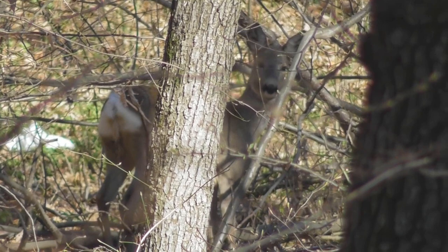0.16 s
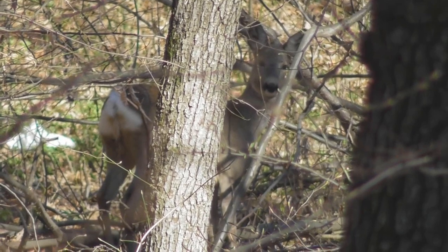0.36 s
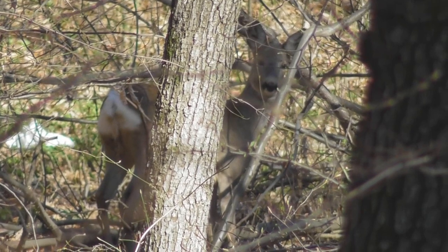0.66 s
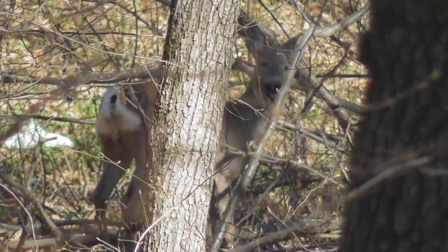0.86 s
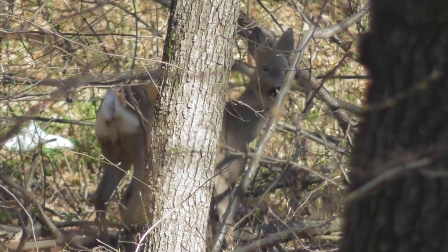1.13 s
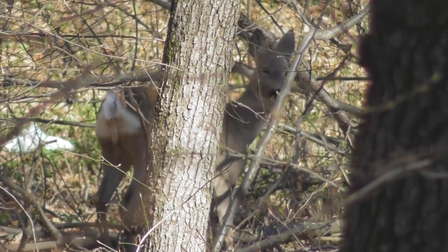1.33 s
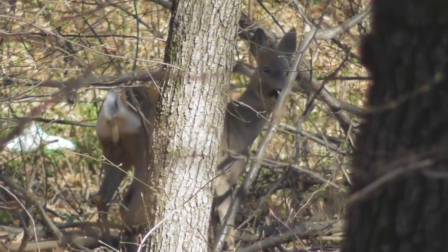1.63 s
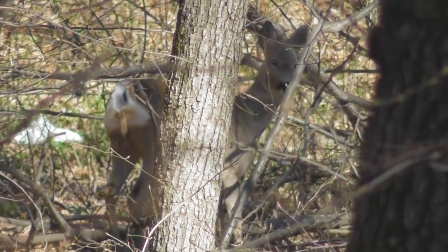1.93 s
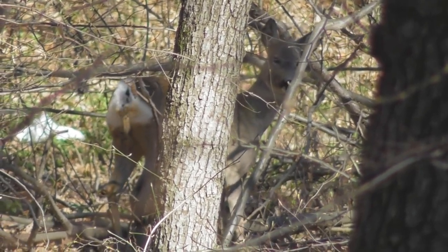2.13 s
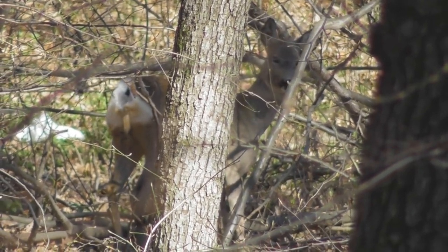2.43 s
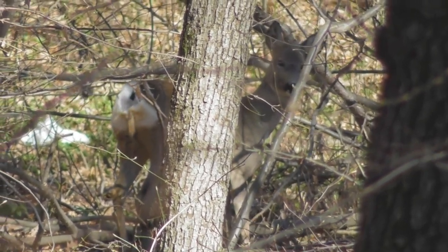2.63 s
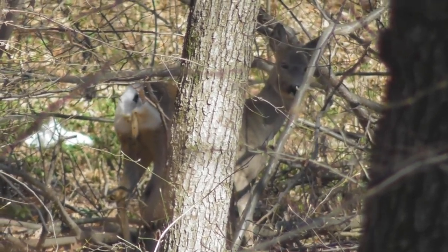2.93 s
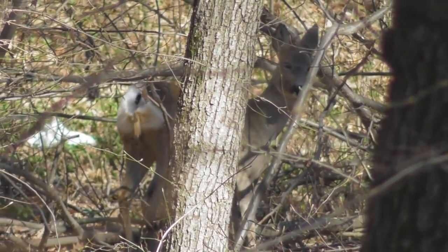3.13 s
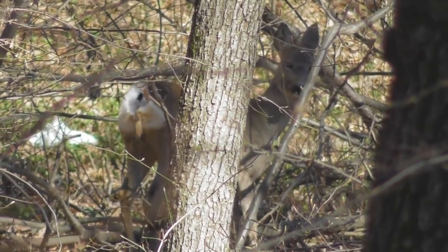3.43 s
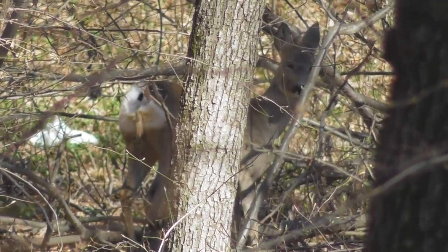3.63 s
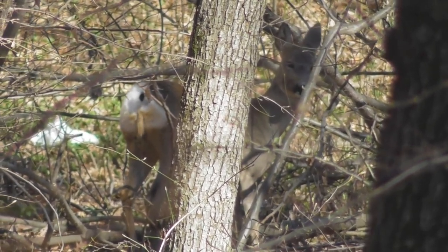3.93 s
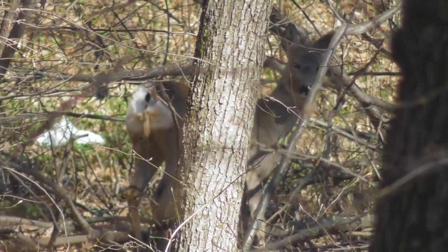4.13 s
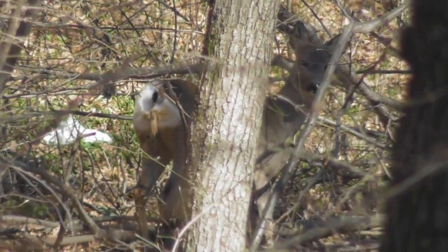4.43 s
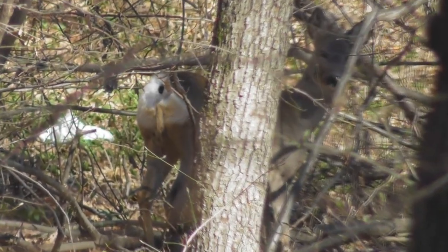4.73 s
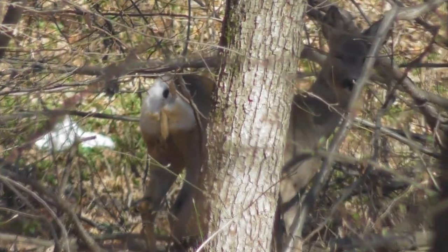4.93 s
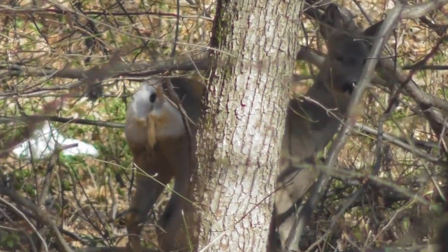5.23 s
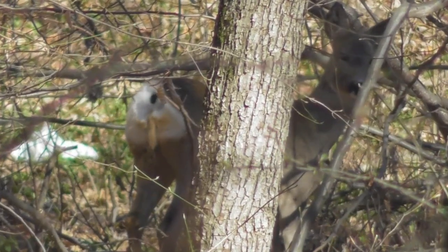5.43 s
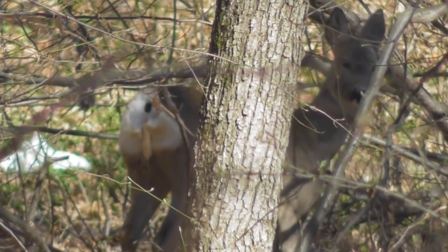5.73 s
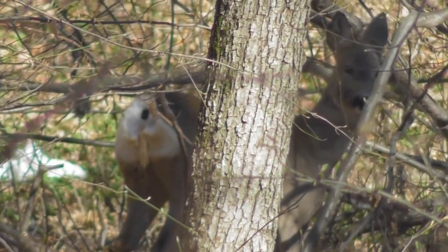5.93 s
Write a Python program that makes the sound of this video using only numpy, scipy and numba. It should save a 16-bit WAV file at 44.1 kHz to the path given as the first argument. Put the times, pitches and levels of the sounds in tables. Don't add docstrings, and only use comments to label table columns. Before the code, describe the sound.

In an open wood with low far hum and steady hiss, a deer coughs briefly, then barks loudly and harshly at about one second. Four softer, darker barks follow, spaced apart, each leaving an echo among the trunks. A small bird chirps thinly and sings falling whistles. Close plastic clicks come from the handheld camera, whose lens motor whirrs and ticks near the end.

```python
import sys
import numpy as np
from scipy import signal
from scipy.fft import rfft, irfft
from scipy.io import wavfile
from scipy.ndimage import uniform_filter1d
from numba import njit

SR = 44100
rng = np.random.default_rng(int(sys.argv[2]) if len(sys.argv) > 2 else 0)


def persist_wave(psi):
    counts = np.round(np.clip(psi, -1, 1) * 32767).astype(np.int16)
    wavfile.write(sys.argv[1], SR, np.atleast_2d(counts).T)


def undo_db(level):
    steps = np.asarray(level, float) / 20
    return 10 ** steps


N = 268128


@njit
def svf(x, centre_hz, width_hz):
    y, band_state, low_state = np.empty(len(x)), 0., 0.
    for i in range(len(x)):
        g = np.tan(np.pi * centre_hz[i] / SR)
        k = width_hz / centre_hz[i]
        v = (band_state + g * (x[i] - low_state)) / (1 + g * (g + k))
        band_state, low_state, y[i] = 2 * v - band_state, low_state + 2 * g * v, k * v
    return y


def band(x, hz, width_hz):
    return svf(x, hz + np.zeros(len(x)), float(width_hz))


def unit(x):
    return x / np.sqrt(np.mean(x ** 2))


def twice(x, hz, width_hz):
    return unit(band(band(x, hz, width_hz), hz, 1.5 * width_hz))


def edge(x, hz, kind):
    return signal.sosfilt(signal.butter(5, hz, kind, fs=SR, output="sos"), x)


def along(table):
    s, *columns = np.transpose(table)
    first, last = int(s[0] * SR), min(int(s[-1] * SR), N)
    t = np.arange(first, last) / SR
    return slice(first, last), [np.interp(t, s, c) for c in columns]


def on_log(table, hz):
    table_hz, *columns = np.transpose(table)
    return [np.interp(np.log(hz + 1), np.log(table_hz), c) for c in columns]


def fade(n, ends_s):
    i = np.arange(n)
    return np.minimum(1, np.minimum(i, i[::-1]) / (ends_s * SR))


def walk(n, rate_hz):
    k = max(int(SR / rate_hz), 1)
    return unit(uniform_filter1d(uniform_filter1d(rng.standard_normal(n), k), k))


def tone(hz):
    return np.sqrt(2) * np.sin(2 * np.pi * np.cumsum(hz) / SR)


def echo(x, response):
    return signal.fftconvolve(x[None], response, axes=1)[:, :N]


# (frequency [Hz], width [Hz], depth [0-1])
HOUSING = [(1700, 500, 0.55), (2800, 270, 0.78), (5050, 1700, 0.43)]


def housing(x):
    for hz, width_hz, depth in HOUSING:
        x = x - depth * band(x, hz, width_hz)
    return x


# (frequency [Hz], density [dB per Hz])
AIR = [(15, -14), (25, -6.5), (82, -1.5), (711, -9), (1360, -18.5), (1690, -26.5), (1980, -17),
       (2740, -25.5), (3590, -20.5), (4340, -24), (4970, -32.5), (5540, -26), (7860, -17.5), (14600, -26),
       (15900, -22.5)]
# (frequency [Hz], side minus mid [dB])
AIR_SIDE = [(40, 0), (110, -1), (300, 2.5), (700, -2), (1300, -5.5), (2400, -12.5), (4400, -9.5),
            (8000, -11), (11000, -3.5), (15000, -0.5)]
# (loudest at [s], level [dB], rise [dB/s], fall [dB/s])
RUMBLE = [
    (1.24, -56, 100, 14),
    (2.45, -55.5, 60, 44),
    (3.1, -57, 60, 23),
    (4.1, -56, 60, 24),
    (5.1, -64, 6, 40),
    (5.8, -51, 104, 24),
]


def air():
    level_db, rumble_db = -76 + 11, -6
    gain_step_s, gain_rise_s, gain_step_db = 1.02, 0.09, 2.5
    hz, t = np.fft.rfftfreq(N, 1 / SR), np.arange(N) / SR
    mid_db = on_log(AIR, hz)[0]
    side_db = mid_db + on_log(AIR_SIDE, hz)[0]
    mid = irfft(rfft(rng.standard_normal(N)) * undo_db(mid_db), N)
    side = irfft(rfft(rng.standard_normal(N)) * undo_db(side_db), N)
    gain_db = level_db + gain_step_db * np.clip((t - gain_step_s) / gain_rise_s, 0, 1)
    gain = undo_db(gain_db) / np.std(mid)
    swells_db = [db - np.maximum(rise * (s - t), fall * (t - s)) for s, db, rise, fall in RUMBLE]
    rumble = undo_db(np.max(swells_db, axis=0) + rumble_db) * twice(rng.standard_normal(N), 158, 280)
    return gain * (mid + side * np.array([[1], [-1]])) + rumble


def glide(start_s, length_s, from_hz, to_hz, bend, db):
    u = np.linspace(0, 1, num=9)
    return np.transpose([start_s + length_s * u, from_hz + (to_hz - from_hz) * u ** bend, db(u)])


def blur(x, t60_s, db):
    t = np.arange(SR // 2) / SR
    scatter = rng.standard_normal(len(t)) * undo_db(-60 * t / t60_s)
    return x + undo_db(db) * echo(x, scatter[None] / np.linalg.norm(scatter))[0]


# (start [s], length [s], from [Hz], to [Hz], level [dB])
CHIRPS = [
    (0., 0.036, 8100, 7980, -71),
    (.322, .05, 7850, 7900, -72),
    (.64, .03, 8350, 8680, -69),
    (2.44, .05, 8320, 7800, -62),
    (2.866, 0.069, 8000, 7420, -67),
    (3.663, 0.081, 7350, 7750, -63),
]
# (start [s], whistles [dB], chord [dB], low chord tone [dB])
SONG = [
    (1.152, -67.5, -74, -86),
    (2.342, -70, -74, -83),
    (4.998, -65, -70.5, -75.5),
    (5.892, -65, -72, -80),
]
# (after phrase start [s], length [s], from [Hz], to [Hz], bend [under 1 falls early])
WHISTLES = [
    (0, .1, 7830, 6500, 0.46),
    (0.174, 0.1, 7660, 6220, .6),
    (0.354, .066, 7150, 4820, 1.9),
]
WHISTLE_DB = [-0.5, 1, 2]
WHISTLE_FALL_DB = [-3, -3, -6]
CHORD_HZ = [3740, 6030, 6780, 7450]
CHORD_DB = [0.5, -4, -3.5]


def bird():
    chord_after_s, chord_s, sag = 0.518, 0.112, 0.0218
    chirp_shape = [0, 0.42, 1], [-7, 0, -16]
    notes = []
    for *shape, db in CHIRPS:
        notes.append(glide(*shape, 0.93, lambda u: db + np.interp(u, *chirp_shape)))
    for phrase_s, whistle_db, chord_db, low_db in SONG:
        for (after_s, *shape), db, fall_db in zip(WHISTLES, WHISTLE_DB, WHISTLE_FALL_DB):
            notes.append(glide(phrase_s + after_s, *shape, lambda u: whistle_db + db + fall_db * u * u))
        s = phrase_s + chord_after_s
        for hz, db in zip(CHORD_HZ, [low_db, *np.add(CHORD_DB, chord_db)]):
            notes.append([(s, (1 - 3 * sag) * hz, db - 8), (s + 0.016, hz, db),
                          (s + chord_s, (1 - sag) * hz, db - 0.5)])
    song = np.zeros(N)
    for note in notes:
        if note[0][0] >= N / SR:
            continue
        where, (hz, db) = along(note)
        waver = walk(len(hz), 150)
        song[where] += undo_db(db + 2 * waver) * fade(len(hz), 0.008) * tone(hz * (1 + 0.004 * waver))
    return housing(blur(song, 0.43, -2.5))


def snap(hz, width_hz, db, times_s, decay_s):
    t = np.arange(600) / SR
    out = np.zeros(N + len(t))
    for s, gain, noise in zip(times_s, undo_db(db), rng.standard_normal((len(times_s), len(t)))):
        ring = band(noise * np.exp(-t / decay_s), hz, width_hz)
        out[int(s * SR):][:len(t)] += gain * ring / np.abs(ring).max()
    return out[:N]


# (time [s], peak [dB], body ring [dB], high crack [dB], broad knock [dB])
CLICKS = [(0.2538, -76, -8, 5, -3), (0.2974, -60, -5, 3, -4), (1.3365, -62, -5, 12, -10),
          (2.0854, -63, 2, 0, -8), (2.163, -54.5, 11, 13, -5), (2.1994, -62, -6, 13.5, -7),
          (2.23, -64, -1, 7, 6), (2.9028, -45, -25, -1, -20), (3.8801, -68, -11, 4, -10),
          (3.9261, -52, -1, -1, -10), (4.2015, -66, 12, -5, -7), (4.5414, -44, -1, -22, -19),
          (4.556, -54.5, 9.5, -5, -10), (4.6952, -50, -10, -4, -16), (4.8574, -46.5, -21, -5, -23),
          (6.0362, -59.5, 8, 8.5, -8)]


def shell_clicks():
    s, db, body_db, crack_db, knock_db = np.transpose(CLICKS)
    tick = snap(4000, 1600, db, s, 0.00071)
    body = snap(1780, 650, db + body_db, s, 0.0052)
    crack = snap(7700, 2600, db + crack_db, s, 0.0039)
    knock = edge(snap(1500, 14000, db + knock_db + 5, s, 0.0015), 15000, "low")
    return tick + body + crack + knock


# (start [s], length [s], first [dB], last [dB])
WHIRR = [
    (4.545, 0.42, -73.5, -82.5),
    (4.864, .25, -75.5, -79),
    (5.108, 0.135, -71, -79),
]
# (frequency [Hz], width [Hz], level [dB])
MOTOR = [(1900, 120, 14.5), (3250, 630, 5), (3930, 480, -0.5), (7750, 220, 9), (9400, 530, -26),
         (6300, 1900, 0.5), (7800, 1000, 0)]


def motor_whirr():
    out = np.zeros(N)
    for start_s, length_s, first_db, last_db in WHIRR:
        where, (db,) = along([(start_s, first_db), (start_s + length_s, last_db)])
        gears = rng.standard_normal(len(db)) * undo_db(2.1 * walk(len(db), 90))
        shell = sum(undo_db(level_db) * band(gears, hz, width_hz) for hz, width_hz, level_db in MOTOR)
        out[where] += undo_db(db + 8.5) * fade(len(db), 0.01) * unit(shell)
    return out


# (first [s], last [s], step [s], first [dB], last [dB])
STEPS = [
    (4.702, 4.783, .0394, -61, -64.5),
    (5.146, 5.2101, .0221, -62, -59),
    (5.242, 5.6026, .04, -60.5, -66),
    (5.422, 5.5014, .08, -67, -76),
    (5.623, 5.762, .02, -72, -59),
    (5.8404, 5.884, .04, -63, -58),
]


def motor_steps():
    runs = [np.linspace((first_s, first_db), (last_s, last_db), round((last_s - first_s) / step_s) + 1)
            for first_s, last_s, step_s, first_db, last_db in STEPS]
    s, db = np.concatenate(runs).T
    knock_scatter_db, ring_scatter_db = 1.2 * rng.standard_normal((2, len(s)))
    return snap(2000, 890, db + 9 + knock_scatter_db, s, 0.0029) + snap(4200, 5000, -58 + ring_scatter_db, s, 0.0011)


def camera():
    return housing(shell_clicks() + motor_whirr() + motor_steps())


EFFORT = {"cough": (.01, -16, -4, -8, -14, .008), "facing": (.017, -24, -4, -8, -22, .04),
          "away": (.045, -28, -6, -6, -16, .06)}
JAW = {"cough": (0.54, 1.4, 930, 1150), "facing": (0.79, 0.76, 1098, 1030),
       "away": (1.018, 0.897, 1040, 1184)}


def gesture(posture, start_s, top_s, length_s, db, first_hz):
    pitch_hz, pitch_sag = 165.62, 0.025
    attack_s, first_db, struck_db, held_db, last_db, release_s = EFFORT[posture]
    early, late, second_from_hz, second_to_hz = JAW[posture]
    s = np.array([0, attack_s, top_s, max(length_s - release_s, top_s), length_s])
    gone = s / length_s
    effort_db = db + np.array([first_db, struck_db, 0, held_db, last_db])
    jaw = np.interp(s, [0, top_s, length_s], [early, 1, late])
    second_hz = second_from_hz + (second_to_hz - second_from_hz) * gone
    return np.transpose([start_s + s, effort_db, first_hz * jaw, second_hz, pitch_hz * (1 - pitch_sag * gone)])


# (frequency [Hz], width [Hz], level [dB])
UPPER = [(1700, 300, -6), (2050, 300, 0), (2350, 250, -7), (2750, 300, -10), (3200, 450, -5),
         (3850, 500, -8), (5500, 800, -16), (6700, 1000, -19), (8400, 800, -18), (9600, 800, -22)]


def bark(table, closing_db, width_hz, broad_db, second_db, third_db, upper_db, treble_db, chest_db):
    _, (db, first_hz, second_hz, pitch_hz) = along(table)
    n = len(db)
    phase = np.cumsum(pitch_hz * (1 + 0.1 * walk(n, 90))) / SR
    pulses = np.diff(np.floor(phase), prepend=0) * undo_db(2.5 * walk(n, 150))
    breath = rng.standard_normal(n) * np.exp(-(phase % 1) / 1.4)
    source = unit(pulses) + 1.6 * unit(breath)
    opening = undo_db(closing_db * np.linspace(0.4, -0.6, n))
    first = twice(source, first_hz, width_hz) + undo_db(broad_db) * twice(source, 0.92 * first_hz, 262)
    second = undo_db(second_db) * twice(source, second_hz, 243)
    third = undo_db(third_db) * twice(source, 1329, 325)
    throat = first - opening * (second - third)
    upper = 0
    for k, (hz, upper_width_hz, level_db) in enumerate(UPPER):
        if hz > 3000:
            level_db = level_db + treble_db
        upper = upper + (-1) ** k * undo_db(level_db) * twice(source, hz, upper_width_hz)
    hum = tone(pitch_hz * (1 + 0.02 * walk(n, 30)))
    chest = undo_db(-5) * hum + undo_db(-4) * twice(source, pitch_hz, 50) + undo_db(-1.5) * twice(source, 354, 175)
    voice = edge(edge(throat, 1800, "low"), 483, "high")
    voice += undo_db(upper_db) * opening * edge(upper, 1270, "high") + undo_db(chest_db) * chest
    return undo_db(db) * fade(n, 0.0061) * voice


# (frequency [Hz], t60 [s], level [dB], side [dB])
WOOD = [(151, 0.37, -5, -1.5), (286, 1.58, -5, 2.5), (510, 3.18, -12.5, -34), (754, 2.29, -10, -20),
        (823, 1.22, -12.5, -15), (1310, 2.58, -16.5, -13.5), (2240, 1.79, -15, -13.5),
        (3470, 0.43, -12.5, -8), (8000, 0.41, -16, 1)]


def wood():
    build_s = 0.0037
    t = np.arange(3 * SR) / SR
    out = 0
    for hz in 100 * 2 ** np.arange(0, 7, 1 / 3):
        t60_s, db, side_db = on_log(WOOD, hz)
        mid, side = (unit(band(rng.standard_normal(len(t)), hz, hz / 4)) * np.sqrt(hz) for _ in range(2))
        out = out + undo_db(db - 60 * t / t60_s) * (mid + undo_db(side_db) * side * np.array([[1], [-1]]))
    return out * (1 - np.exp(-t / build_s)) / np.sqrt(SR * 1e3)


BARKS = {"cough": [(1.004, .018, 0.04, -45.5, 880)], "facing": [(1.044, 0.11, .29, -31.5, 876)],
         "away": [(2.315, 0.15, .42, -38.5, 675), (3.022, 0.13, .3, -40, 640), (3.92, 0.048, .36, -43, 643),
         (5.732, 0.11, 0.46, -42, 614)]}
VOICE = {"cough": (13, 250, -11, -2, -32, -27, 3, -25, -9.5),
         "facing": (6.5, 125, -0.5, -4.5, -2, -12, -6, -21.5, -4.5),
         "away": (8, 111.5, -6.5, -3, -9.5, -16, -21, -24, -8.5)}


def deer():
    wet_db, lean = -3, 0.19
    straight, sent = np.zeros(N), np.zeros(N)
    for posture, rows in BARKS.items():
        *colour, direct_db = VOICE[posture]
        for row in rows:
            table = gesture(posture, *row)
            where, _ = along(table)
            voice = bark(table, *colour)
            straight[where] += voice * undo_db(direct_db)
            sent[where] += voice
    both = np.array([housing(c) for c in straight + undo_db(wet_db) * echo(sent, wood())])
    lows = band(both.mean(axis=0), 750, 1100)
    return both + lean * lows * np.array([[-1], [1]])


def scene():
    return air() + bird() + camera() + deer()


def roll_off(x):
    return signal.sosfilt(signal.butter(12, 16020, fs=SR, output="sos"), x)


def record(dry):
    low_pass = signal.ellip(8, 0.2, 60, 15850, fs=SR, output="sos")
    mix = signal.sosfilt(low_pass, dry)
    return roll_off(mix)


dry = scene()
out = record(dry)
persist_wave(out)
```